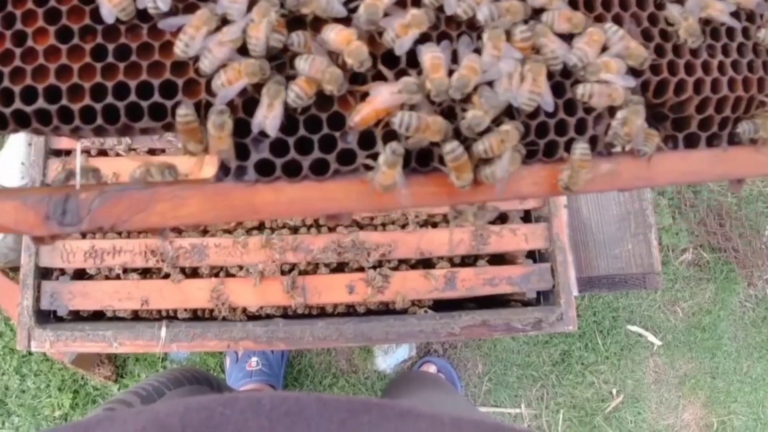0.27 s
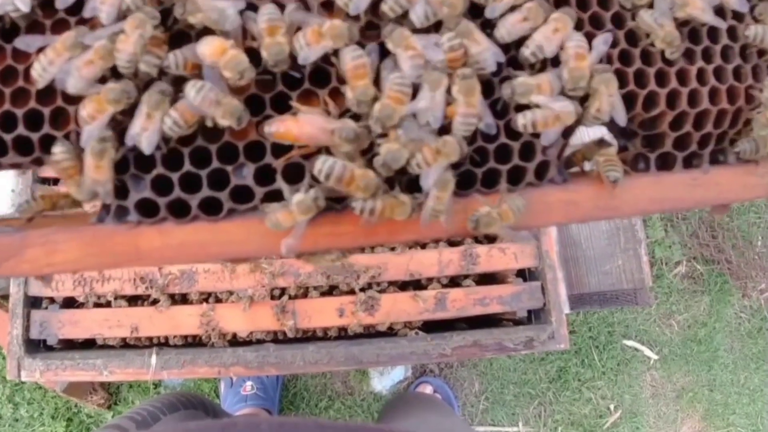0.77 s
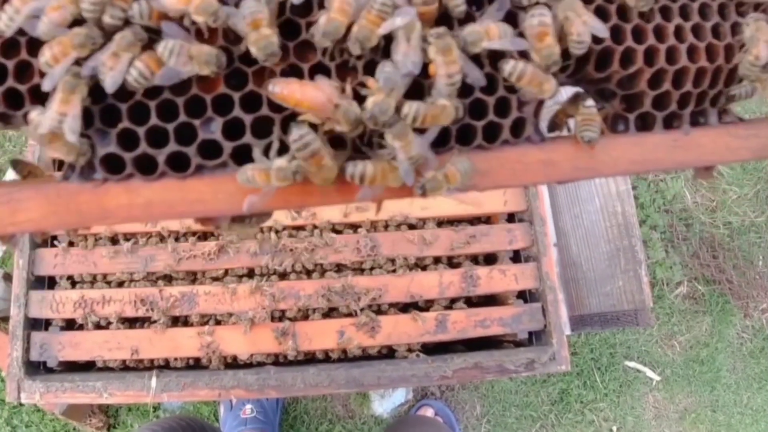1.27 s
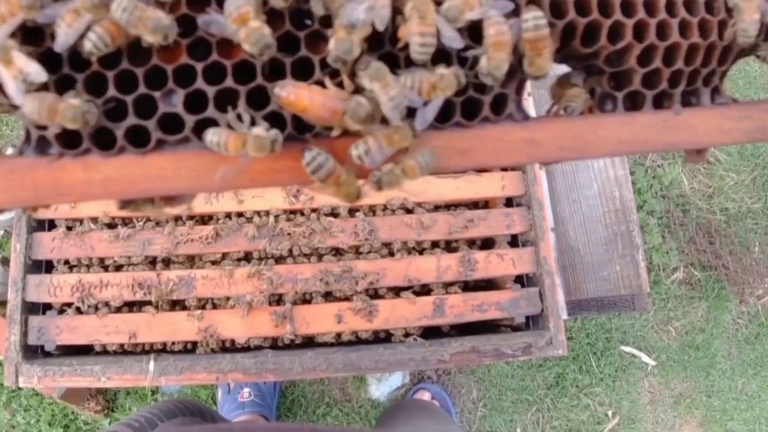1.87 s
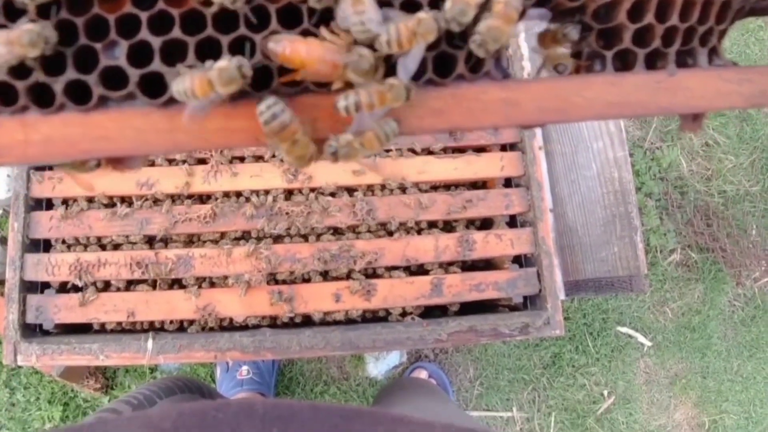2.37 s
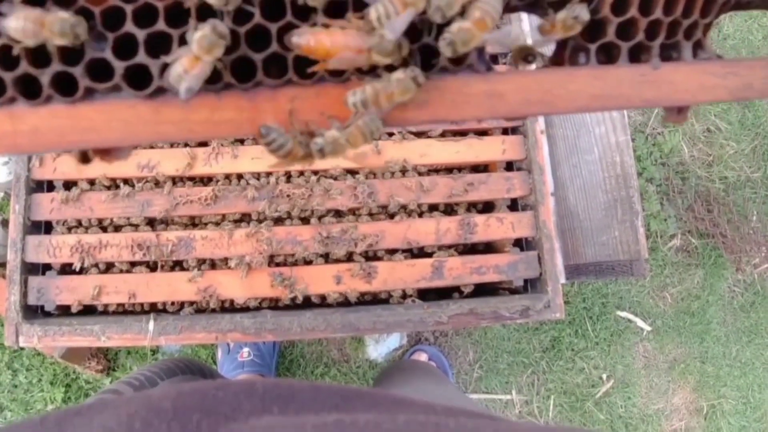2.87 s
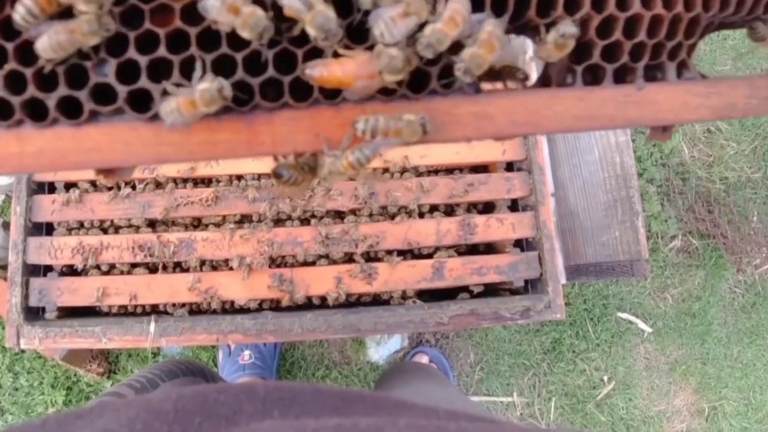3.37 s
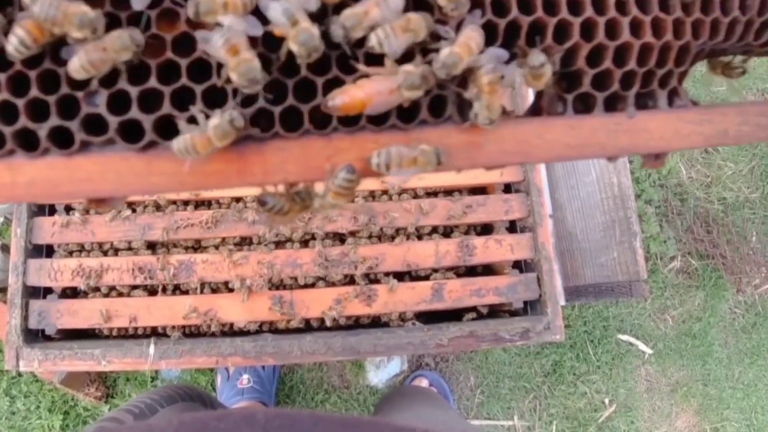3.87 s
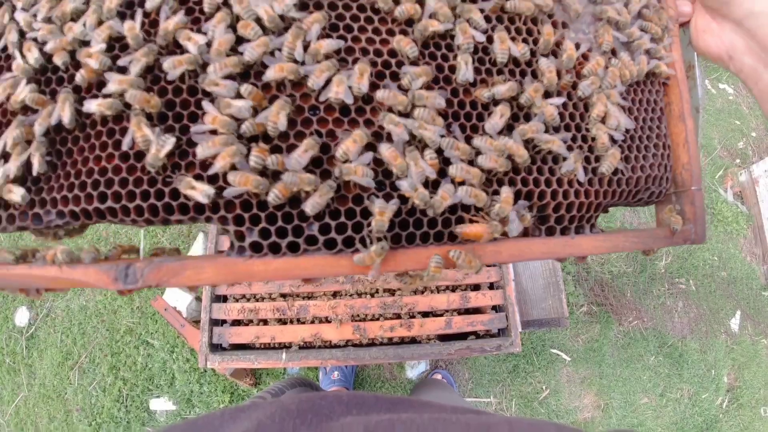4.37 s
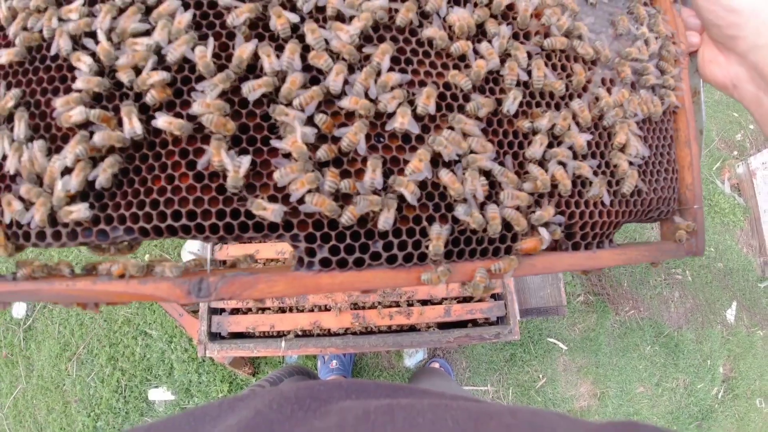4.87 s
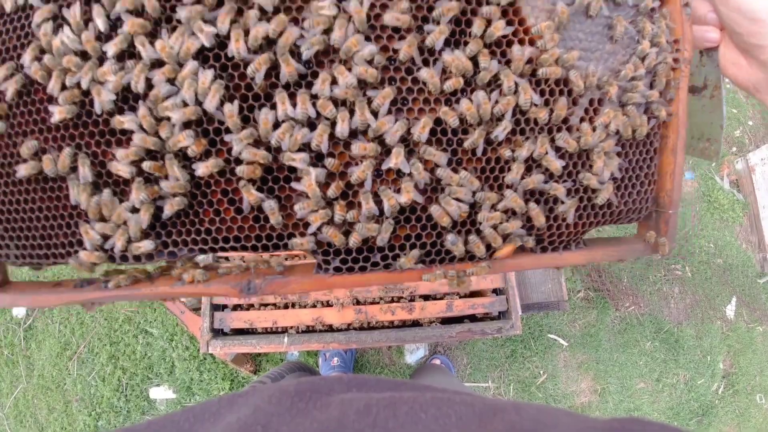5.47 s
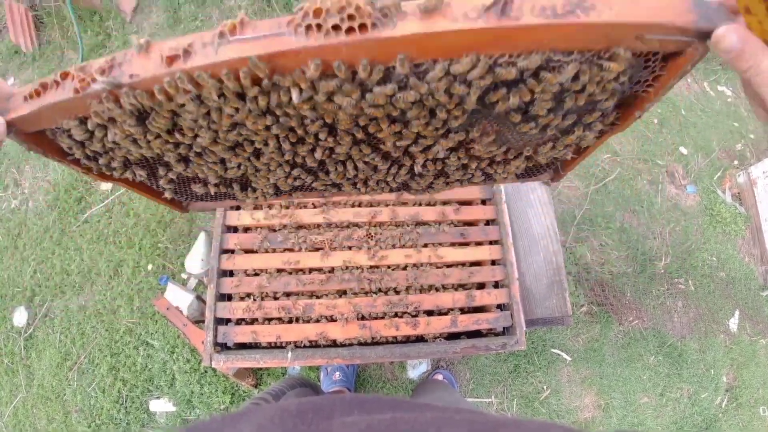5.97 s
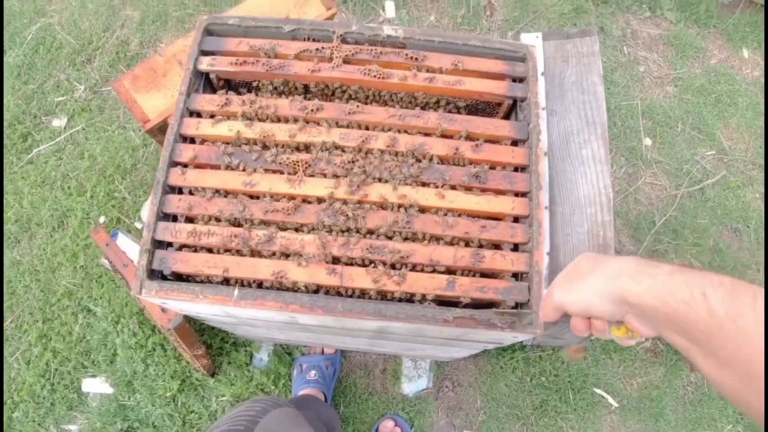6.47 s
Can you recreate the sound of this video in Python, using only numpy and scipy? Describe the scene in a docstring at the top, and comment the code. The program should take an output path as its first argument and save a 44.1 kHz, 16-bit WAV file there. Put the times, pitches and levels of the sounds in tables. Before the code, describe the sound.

Many bees hum low and steadily in an open hive outdoors, small birds whistle and chatter, wind rumbles, and finally a tool scrapes wood.

```python
"""Open beehive in a meadow

Many bees beat their wings near 200 Hz (wandering harmonic tones) and single bees swell past.
A tool scrapes along the wooden box at the end: random slips ring resonances, and the wood groans.
Small birds whistle (gliding sines) and chatter (pulses through throat resonances), with yard echoes.
Gusts rumble on the microphone ports; meadow air and rustles are banded noise. Two short silences.
"""
import sys
import numpy as np
from scipy import signal
from scipy.io import wavfile
from scipy.ndimage import uniform_filter1d

SR = 44100
rng = np.random.default_rng(int(sys.argv[2]) if len(sys.argv) > 2 else 0)


def wrap_up_sound(samples):
    """Save the sound to the file named by the first command line argument, as 16-bit audio."""
    columns = np.atleast_2d(samples).T
    # keep every value between -1 and 1, then stretch to whole-number steps
    tamed = np.clip(columns, -1, 1)
    steps = np.round(tamed * 32767).astype(np.int16)
    wavfile.write(sys.argv[1], SR, steps)


N = 296352

# Stretches of sound between the silences. Each row: start in seconds, end in seconds.
STRETCHES = [(-1.0, 4.045), (4.253, 6.0115), (6.219, 8.0)]
# Breathy throat resonances of the birds. Each row: centre in Hz, width in Hz, gain in dB.
THROAT_MODES = [(1900, 500, -3), (2600, 450, -2), (3600, 600, 1), (4800, 400, -3), (5800, 500, -13)]


def from_db(db):
    """Decibels to gain."""
    return 10 ** (np.asarray(db) / 20)


def rms_one(x):
    """Scale to unit rms."""
    return x / np.sqrt(np.mean(x ** 2) + 1e-20)


def in_time(rows):
    """Columns of a curve table (time in seconds first) at every sample."""
    s, *columns = np.transpose(rows)
    return [np.interp(np.arange(N) / SR, s, column) for column in columns]


def at_hz(points, hz):
    """Read a spectrum table on a log frequency axis."""
    table_hz, values = np.array(points).T
    return np.interp(np.log(hz), np.log(table_hz), values)


def drift(rate_hz):
    """Slow chance of spread 1: coarse noise through a double one-pole low-pass."""
    r = np.exp(-80 * np.pi * rate_hz / SR)  # one coarse step is 40 samples
    noise = rng.standard_normal(N // 40 + 2002)
    slow = signal.lfilter([1], [1, -2 * r, r * r], noise)[2000:]
    return np.interp(np.arange(N) / 40, np.arange(len(slow)), rms_one(slow))


def resonate(x, modes):
    """Parallel two-pole resonances of alternating sign."""
    out = 0
    for k, (hz, width_hz, db) in enumerate(modes):
        r = np.exp(-np.pi * width_hz / SR)
        b = np.array([1, 0, -1]) * (1 - r * r) / 2
        a = [1, -2 * r * np.cos(2 * np.pi * hz / SR), r * r]
        out = out + (-1) ** k * from_db(db) * signal.lfilter(b, a, x)
    return out


def stereo(mid, side, alike):
    """Two unrelated signals mixed to a left-right likeness."""
    alike = np.clip(alike, -1, 1)
    return np.sqrt((1 + alike) / 2) * mid + np.sqrt((1 - alike) / 2) * side * [[1], [-1]]


def stroke(turn, first_db, fall_db):
    """One wing cycle: harmonics of random phase; first_db lifts the lowest, fall_db dulls those above 3."""
    # Wing harmonics. Each row: multiple of the beat rate, level in dB before first_db and fall_db.
    lines = [(1, -4.8), (2, 0), (3, -18.5), (4, -21), (5, -16), (6, -28), (7, -25), (8, -32), (9, -34)]
    wave = 0
    for k, db in lines:
        line_db = db + first_db * (k < 1.5) - fall_db * max(k - 3, 0)
        wave = wave + from_db(line_db) * np.sin(2 * np.pi * (round(k) * turn + rng.random()))
    return wave


def bees(wing_hz, spread_share, jitter, first_db, fall_db, swell_db, count):
    """Each bee repeats one stroke at its own wandering rate, swells as it moves and reaches one port first."""
    wander_share, port_lag_s = .03, .00008  # spreads of slow rate drift and of lag between the ports
    turn = np.linspace(0, 1, 513)
    out = np.zeros((2, N))
    for spread in np.linspace(-1.7, 1.7, count):
        hz = wing_hz * (1 + spread_share * spread + wander_share * drift(2.5) + jitter * drift(40))
        strokes = np.cumsum(hz) / SR
        lag = hz * port_lag_s * rng.normal() / 2
        near = from_db(swell_db * drift(5.0) - 1.5 * spread ** 2)
        phases = [(strokes + lag) % 1, (strokes - lag) % 1]
        out += near * np.interp(phases, turn, stroke(turn, first_db, fall_db))
    return rms_one(out)


def fly_bys(jitter, fall_db):
    """Single bees swell past, each on its own sagging wing tone."""
    # Close passes. Each row: nearest moment in seconds, level in dB, wing rate in Hz,
    # half width in seconds, lift of the lowest harmonic in dB.
    passes = [(.08, -61, 240, .1, -10), (1.03, -55, 256, .1, -10), (1.38, -60, 250, .1, -10),
              (1.8, -54, 268, .1, -10), (1.8, -57, 184, .06, 3), (2.0, -59, 250, .1, -10),
              (2.4, -59, 268, .1, -10), (2.8, -55, 254, .1, -10), (3.25, -59, 240, .1, -10),
              (3.745, -52, 208, .035, -8), (3.76, -55, 270, .04, -12), (3.83, -48, 272, .035, -14),
              (3.85, -50, 222, .045, -3), (3.885, -53, 335, .04, -8), (3.97, -53, 192, .05, -8),
              (4.6, -57, 236, .09, 5), (4.7, -51, 214, .07, -8), (4.71, -55, 246, .04, -10),
              (5.08, -52, 268, .05, -12), (5.24, -54, 254, .1, -12)]
    sag_share, third_db = .04, -9  # rate sags by this share each way; added third harmonic re the lift
    t, turn, out = np.arange(N) / SR, np.linspace(0, 1, 513), np.zeros(N)
    waver = drift(25)
    for k, (s, db, wing_hz, half_s, first_db) in enumerate(passes):
        away = (t - s) / half_s
        hz = wing_hz * (1 - sag_share * np.tanh(away / 2) + jitter * np.roll(waver, k * SR // 3))
        third = from_db(first_db + third_db) * np.sin(2 * np.pi * (3 * turn + rng.random()))
        wave = np.interp(np.cumsum(hz) / SR % 1, turn, stroke(turn, first_db, fall_db) + third)
        out += from_db(db) / (1 + away ** 2) * wave
    return out


def colony():
    """Many bees on the comb, faster and duller ones far off in the air, and single passes."""
    # Hum of the comb. Each row: time in seconds, level in dB.
    hum = [(0.0, -57), (.07, -51), (.46, -58), (.8, -59), (1.03, -52), (1.3, -55), (1.58, -58), (1.78, -50),
           (2.12, -56), (2.22, -51), (2.85, -52), (3.1, -53), (3.4, -48), (3.62, -54), (3.83, -49),
           (4.3, -55), (4.72, -50), (4.97, -54), (5.05, -52), (6.0, -52.5), (6.25, -58), (6.72, -57)]
    comb = bees(204, spread_share=.068, jitter=.017, first_db=0, fall_db=0, swell_db=6.5, count=13)
    flying = bees(255, spread_share=.11, jitter=.008, first_db=-15, fall_db=5.0, swell_db=5.0, count=8)
    comb_db, flying_db = in_time(hum)[0], -61
    return from_db(comb_db) * comb + from_db(flying_db) * flying + fly_bys(jitter=.02, fall_db=3.5)


def rubbed(slips, modes):
    """Slips ring a body twice over; in the first pass each mode swells and fades with the grip."""
    grip_db, grip_hz = 2.0, 14  # the shifting contact favours now one mode, now another
    first = 0
    for k, mode in enumerate(modes):
        first = first + (-1) ** k * from_db(grip_db * drift(grip_hz)) * resonate(slips, [mode])
    return resonate(first, modes)


def groan(jitter, second_db, tremble_db):
    """The wood sticks and slips in a rough gliding tone with a weaker octave."""
    # Low tone. Each row: time in seconds, pitch in Hz, rms level of the fundamental in dB.
    glide = [(6.47, 380, -70), (6.5, 365, -43), (6.53, 370, -56), (6.575, 370, -45), (6.6, 400, -58),
             (6.635, 420, -44), (6.66, 385, -38), (6.682, 320, -41), (6.7, 240, -44), (6.72, 222, -42)]
    hz, db = in_time(glide)
    phase = 2 * np.pi * np.cumsum(hz * (1 + jitter * drift(60))) / SR
    on = np.arange(N) > glide[0][0] * SR
    gain = on * np.sqrt(2) * from_db(db + tremble_db * drift(40))
    return gain * (np.sin(phase) + from_db(second_db) * np.sin(2 * phase))


def scrape(per_s, size_db):
    """Dense uneven slips of steel on wood ring the tool, its pitch and brightness varying, and the box wall."""
    # Strokes. Each row: time in seconds, tool level in dB, box wall level in dB,
    # brightness as a gain above 2200 Hz, ring pitch as a ratio.
    strokes = [(6.22, -45, -55, .8, .99), (6.33, -51, -55, .6, .99), (6.35, -45, -57, .7, .99),
               (6.44, -39, -52, 1.0, 1.0), (6.47, -43, -56, 1.0, .98), (6.492, -44, -42, 1.0, .97),
               (6.546, -46, -43, 1.0, .96), (6.612, -42, -45, 1.0, 1.02), (6.66, -40, -38.5, 1.1, 1.03),
               (6.72, -41, -50, 1.2, 1.0)]
    # Tool resonances. Each row: centre in Hz before the pitch ratio, width in Hz, gain in dB per pass.
    tool_modes = [(860, 70, -9), (1180, 350, -10), (1420, 140, -2.5), (1640, 110, 1.5), (1760, 130, 3.5),
                  (1910, 130, 0), (2300, 260, -1), (2620, 200, -3), (2900, 260, -1), (3200, 300, -.8),
                  (3600, 400, -3), (4050, 400, -3.5), (4800, 500, -7.5), (6000, 1800, -17)]
    # Box wall resonances. Each row: centre in Hz, width in Hz, gain in dB per pass.
    wall_modes = [(225, 70, -3), (310, 70, -1), (382, 90, 0), (458, 80, -.5), (520, 80, -3), (700, 70, -6),
                  (865, 60, -6), (1040, 120, -10)]
    tool_db, wall_db, bright, pitch = in_time(strokes)
    slips = (rng.random((2, N)) < per_s / SR) * rng.choice([-1, 1], (2, N))
    slips = slips * from_db(size_db * np.minimum(rng.exponential(1, (2, N)), 4))
    # reading the ring faster or slower bends its pitch
    read = np.cumsum(pitch)
    read = read - read[-1] + N - SR // 10
    rung = np.array([np.interp(read, np.arange(N), x) for x in rubbed(slips, tool_modes)])
    dull = signal.sosfilt(signal.butter(2, 2200, fs=SR, output="sos"), rung)
    shaded = dull + bright * (rung - dull)
    tool = from_db(tool_db) * stereo(*shaded, .55) / np.std(rung[:, N // 2:])
    wall = from_db(wall_db) * rms_one(stereo(*rubbed(slips, wall_modes), .97))
    on = np.arange(N) > STRETCHES[2][0] * SR - 500
    return (tool + wall) * on + groan(jitter=.03, second_db=-22, tremble_db=2.5)


def whistles(waver, flutter_hz):
    """Each note is a near sine gliding along a parabola through three pitches; rough ones flutter."""
    # Whistled notes. Each row: start in seconds, length in ms, start, middle and end pitch in Hz,
    # level in dB before the lifts below, roughness 0-1.
    notes = [(0.022, 18, 4150, 4100, 4450, -67, .3), (0.04, 48, 4920, 4800, 4650, -62, .2),
             (0.612, 20, 4000, 3750, 3500, -72, .3), (0.646, 16, 3700, 3380, 3050, -73, .3),
             (0.665, 9, 3100, 3500, 4000, -67, .3), (0.671, 33, 3900, 2950, 2500, -65, .5),
             (0.678, 18, 3800, 4000, 3900, -68, .5), (1.165, 20, 3680, 3000, 2770, -67.5, .3),
             (1.34, 20, 3870, 4050, 4250, -62, .5), (1.364, 24, 4800, 4940, 4850, -67, .3),
             (1.826, 9, 3720, 4000, 4280, -61.2, .3), (2.27, 44, 2650, 2640, 2630, -70, .9),
             (2.283, 9, 3600, 4400, 5150, -63, .3), (2.289, 15, 5150, 5200, 5200, -61, .3),
             (2.478, 32, 3900, 3950, 3900, -67.8, .3), (3.186, 27, 3760, 4130, 4500, -56, .8),
             (3.213, 25, 4400, 3650, 3240, -52.5, .6), (3.228, 24, 3700, 3950, 3450, -59, .8),
             (3.244, 26, 2800, 3000, 3300, -60, .9), (3.262, 20, 3900, 3500, 3100, -63, .9),
             (3.268, 30, 2950, 2950, 3200, -58, .9), (3.331, 28, 3200, 3500, 3400, -69, .9),
             (3.298, 34, 3710, 3010, 2690, -62.0, .8), (3.655, 50, 5000, 4400, 3600, -66, .3),
             (3.672, 44, 5100, 4100, 3150, -58.5, .4), (3.712, 50, 3100, 2500, 1600, -64.5, .5),
             (4.25, 22, 4950, 5000, 4900, -68, .3), (4.766, 28, 3710, 4170, 4090, -46.3, .3),
             (4.794, 29, 4190, 3750, 4020, -46.4, .3), (4.824, 12, 2600, 2900, 3300, -58, .9),
             (4.832, 22, 3250, 3600, 3600, -47.5, .8), (4.852, 16, 2900, 3200, 3500, -56, .9),
             (4.852, 26, 2000, 2350, 2400, -62, .9), (4.898, 30, 4200, 4180, 4100, -66, .3),
             (4.952, 20, 3100, 3300, 3500, -63, .5), (5.115, 25, 3820, 3930, 4100, -63, .5),
             (5.245, 26, 3700, 4200, 4500, -62, .5), (5.335, 17, 2330, 2820, 1800, -60.7, .3),
             (5.606, 44, 3480, 3800, 4050, -48.2, .3), (5.657, 34, 3650, 3500, 3250, -50.0, .8),
             (5.763, 20, 2140, 2030, 1400, -43.5, .4), (5.783, 12, 1450, 1100, 900, -54, .8),
             (5.82, 18, 880, 1000, 900, -52.0, .3)]
    top_share = .44  # share of the length at which a note's envelope peaks
    bend = np.log(.5) / np.log(top_share)
    out, shake, tremble = np.zeros(N), drift(250), drift(150)
    flutter = np.sin(2 * np.pi * np.cumsum(flutter_hz * (1 + .25 * drift(60))) / SR)
    for s, ms, start_hz, middle_hz, end_hz, db, rough in notes:
        at, u = round(s * SR), np.linspace(0, 1, round(ms * SR / 1000))
        part = slice(at, at + len(u))
        hz = np.polyval(np.polyfit([0, .5, 1], [start_hz, middle_hz, end_hz], 2), u)
        hz = hz * (1 + waver * rough * (shake[part] + 1.5 * flutter[part]))
        shape = np.sin(np.pi * u ** bend) ** .7
        gain = from_db(db + 3.0 + rough * (2.5 + 4.0 * tremble[part]))
        out[part] += shape * gain * np.sin(2 * np.pi * np.cumsum(hz) / SR)
    return out


def zigzags(waver, tremble_db):
    """One unbroken whistle: a fall to the dip, a rounded hump, a deeper fall and a quick fading warble."""
    # Calls. Each row: dip in seconds, first top in Hz, first fall in ms, warble length in ms, level in dB.
    calls = [(.716, 4450, 15, 23, -49.5), (1.871, 4500, 16, 22, -50.5), (2.324, 5200, 21, 32, -45.5)]
    dip_hz, hump_hz, low_hz = 3170, 4550, 2780  # hump_hz: top between the dip and the low
    rise_ms, drop_ms = 18.5, 23.5  # up the hump and down again
    warble_per_s, warble_top_hz, warble_fade_db = 100, 3620, -5
    warble_lift_hz = 350  # the warble's low turns climb this far above low_hz
    # pitches near throat_hz come out loudest; losses below and above it
    throat_hz, throat_width_hz, below_db, above_db = 3780, 480, 8, 11
    out, shake, tremble = np.zeros(N), drift(200), drift(150)
    low_ms = rise_ms + drop_ms
    for s, top_hz, fall_ms, warble_ms, db in calls:
        ms = np.arange(-fall_ms, low_ms + warble_ms, 1000 / SR)
        at = round((s - fall_ms / 1000) * SR)
        part = slice(at, at + len(ms))
        down = np.clip(-ms / fall_ms, 0, 1)
        up = np.interp(ms, [0, rise_ms, low_ms], [0, .5, 1])
        foot = np.where(up < .5, dip_hz, low_hz)
        hz = foot + (top_hz - foot) * np.sin(np.pi / 2 * down) ** 1.4
        hz = hz + (hump_hz - foot) * np.sin(np.pi * up) ** .95
        late = np.clip(ms - low_ms, 0, None)
        lift = warble_lift_hz * np.clip(late * warble_per_s / 1000, 0, 1)
        turns = np.sin(np.pi * warble_per_s * late / 1000) ** 2
        hz = hz + lift + (warble_top_hz - low_hz - lift) * turns
        hz = hz * (1 + waver * shake[part])
        loss_db = np.where(hz > throat_hz, above_db, below_db)
        throat_db = loss_db * (np.exp(-((hz - throat_hz) / throat_width_hz) ** 2) - 1)
        edges = np.clip(np.minimum(ms - ms[0], ms[-1] - ms) / 3.0, 0, 1)
        gain = from_db(db + throat_db + warble_fade_db * late / warble_ms + tremble_db * tremble[part])
        out[part] += edges * gain * np.sin(2 * np.pi * np.cumsum(hz) / SR)
    return out


def chatter(pulse_hz, grain_db, sharp):
    """Bursts of fast uneven syrinx pulses ring three throat resonances, set per burst, over a little breath."""
    # Harsh bursts. Each row: time in seconds (the burst opens 2 ms earlier), level in dB before a -10.5 dB
    # trim, low and main throat pitch in Hz, low and high resonance in dB re main, length scale in seconds.
    bursts = [(4.848, -47, 2300, 3500, -6, -8, .035), (4.9681, -42, 1900, 3400, -1, -5, .04),
              (5.0818, -45, 2650, 3500, -3, -3, .03), (5.1644, -41, 2500, 3750, -2, -2, .035),
              (5.2614, -41, 2100, 3700, -8, -3, .04), (5.3644, -41, 2700, 3650, -3, -5, .03),
              (5.4814, -46, 1950, 3600, -7, -10, .05)]
    high_hz, width_hz, breath_db = 4800, 420, -8
    swing_share = .05  # throat pitch wander inside a burst
    tail_db, tail_s = -12, .07  # a softer mutter after each burst
    out, t = np.zeros(N), np.arange(round(.15 * SR)) / SR
    tail = from_db(tail_db) * t / tail_s * np.exp(1 - t / tail_s) * (1 - t / t[-1])
    chop = (.5 + .5 * np.sin(2 * np.pi * np.cumsum(pulse_hz * (1 + .25 * drift(40))) / SR)) ** sharp
    rasp = rng.standard_normal(N) * (.4 + chop) * from_db(grain_db * drift(120))
    for s, db, low_hz, main_hz, low_db, high_db, long_s in bursts:
        at, u = round((s - .002) * SR), t / long_s
        part = rasp[at:at + len(u)]
        rung = from_db(breath_db) * resonate(part, THROAT_MODES)
        for hz, level_db in [(low_hz, low_db), (main_hz, 0), (high_hz, high_db)]:
            mode = [(hz, width_hz, 0)]
            rung = rung + from_db(level_db) * resonate(resonate(part, mode), mode)
        read = np.cumsum(1 + swing_share * drift(30)[:len(u)])
        rung = np.interp(read, np.arange(len(u)), rung)
        shape = 1.5 * u ** .35 * np.exp(-u ** 2 * 2.2) + tail
        out[at:at + len(u)] += from_db(db - 10.5) * rms_one(rung) * shape
    return out


def tick():
    """A single dry beak click ringing briefly in the throat."""
    at_s, peak_db = 4.9695, -44
    click = np.zeros(N)
    click[round(at_s * SR)] = 1
    rung = resonate(click + 1e-18, THROAT_MODES)
    return from_db(peak_db) * rung / np.abs(rung).max()


def yard(x):
    """Direct sound from the left; sparse bright scatter from leaves and walls dies away, unlike on each side."""
    echo_db, t60_s, low_hz = -18, .17, 2500
    lag_s = .00004  # the right port hears the birds later
    t = np.arange(round(.25 * SR)) / SR
    taps = (rng.random((2, len(t))) < 500 / SR) * rng.standard_normal((2, len(t))) * (t > .004)
    taps = taps * from_db(echo_db - 60 * t / t60_s)
    bright = signal.sosfilt(signal.butter(4, low_hz, "high", fs=SR, output="sos"), x + 1e-18)
    echoes = signal.fftconvolve(bright[None], taps, axes=1)
    return np.array([x, np.roll(x, round(lag_s * SR))]) + echoes[:, :N]


def far_birds(per_s, level_db):
    """Faint short slides from birds far off, at random moments and pitches, left or right."""
    out = np.zeros((2, N))
    for when, pitch, slide, size, long, pan in rng.random((round(per_s * N / SR), 6)):
        u = np.linspace(0, 1, round((.012 + .03 * long) * SR))
        hz = 2700 + 2200 * pitch + 900 * (slide - .65) * u
        note = from_db(level_db + 9 * size) * np.sin(np.pi * u) * np.sin(2 * np.pi * np.cumsum(hz) / SR)
        # pan by arrival time: left 0-11 samples late, right always 6
        at, lag = int(when * (N - len(u) - 20)), int(12 * pan)
        out[0, at + lag:at + lag + len(u)] += note
        out[1, at + 6:at + 6 + len(u)] += note
    return out


def wind(alike):
    """Lumpy pressure on the ports: a deep rumble and a layer above it; eddies swell and collapse."""
    # Breeze. Each row: time in seconds, rumble level in dB, upper rumble in dB re rumble.
    breeze = [(0, -62, -4), (.2, -57, -6), (.85, -57, -9), (1.3, -49, -8), (1.6, -53, -5), (2.3, -48, -8),
              (2.9, -52, -6), (3.6, -55, -5), (4.04, -55, -5), (4.3, -58, -11), (5.2, -59, -3),
              (5.6, -58, -4), (6.0, -58, -4), (6.25, -53, -4), (6.72, -47, -6)]
    # Eddies hitting the ports. Each row: peak in seconds, level in dB, upper rumble in dB re rumble.
    buffets = [(.98, -45, -8), (1.05, -37, -16), (1.105, -32, -10), (1.24, -42, -16), (1.36, -40, -25),
               (1.43, -49, -8), (1.64, -48, -10), (1.87, -42, -22), (2.04, -43, -12), (2.13, -37, -14),
               (2.18, -42, -5), (2.4, -34, -18), (2.48, -36, -17), (2.62, -38, -7), (2.69, -42, -14),
               (2.8, -45, -23), (3.15, -46, -20), (3.3, -47, -10), (3.4, -41, -16), (3.98, -52, -11),
               (4.322, -53, -19), (4.52, -54, -13), (4.666, -54, -11), (4.908, -54, -22), (5.834, -55, -9),
               (6.37, -43, -8), (6.52, -36, -8), (6.62, -45, -8)]
    lumps_db, rise_s, fall_s = 2.0, .028, .02  # breeze unevenness; buffet half widths
    t = np.arange(N) / SR
    breeze_db, upper_db = in_time(breeze)
    low = from_db(breeze_db + lumps_db * drift(6))
    upper = low * from_db(upper_db)
    for s, db, upper_db in buffets:
        swell = from_db(db) * np.exp(-((t - s) / np.where(t < s, rise_s, fall_s)) ** 2)
        low, upper = low + swell, upper + swell * from_db(upper_db)
    out = 0
    for low_hz, high_hz, level in [(25, 48, low), (66, 112, upper)]:
        band = signal.butter(2, [low_hz, high_hz], "band", fs=SR, output="sos")
        mid, side = signal.sosfilt(band, rng.standard_normal((2, N + SR)))[:, SR:]
        pressure = rms_one(stereo(mid, side, alike))
        # even out the noise's own swells so the level curve leads
        local_power = uniform_filter1d(pressure ** 2, size=round(SR / low_hz))
        even = pressure / (.5 + np.sqrt(local_power + 1e-12))
        out = out + level * rms_one(even)
    return out


def rustles():
    """Short soft swells of grainy band noise."""
    # Soft rushes. Each row: peak in seconds, half width in seconds, low edge in Hz, high edge in Hz, level in dB.
    rushes = [(1.275, .04, 3200, 6600, -77), (2.27, .05, 1800, 3800, -72), (2.87, .03, 3100, 6500, -77),
              (3.44, .05, 2000, 4400, -71), (3.86, .08, 300, 700, -52), (4.69, .055, 1300, 3200, -61),
              (4.7, .05, 11500, 15200, -73), (6.3, .06, 8000, 15000, -82), (6.66, .05, 9300, 11000, -68)]
    t, out = np.arange(N) / SR, 0
    grain = rng.standard_normal((2, N)) * from_db(2.0 * drift(150))
    for s, half_s, low_hz, high_hz, db in rushes:
        band = signal.sosfilt(signal.butter(3, [low_hz, high_hz], "band", fs=SR, output="sos"), grain)
        out = out + from_db(db) * np.exp(-((t - s) / half_s) ** 2) * rms_one(band)
    return out


def air(patchy_db):
    """Meadow air and wing rustle: flickering third-octave noise bands, each with its left-right likeness."""
    # Spectrum. Each row: frequency in Hz, relative density in dB per Hz.
    spectrum = [(240, -22), (310, -1.5), (500, -2), (750, -9.5), (1040, -7), (1260, -19), (1490, -11.5),
                (2300, -22), (3500, -20), (4600, -26), (5500, -38), (7200, -37.5), (10000, -35.5),
                (12800, -39), (15500, -50)]
    # Level. Each row: time in seconds, level in dB, lift of the hiss in dB.
    levels = [(0, -61, 3), (.8, -62, 3), (1.2, -60, 0), (2, -61, 1), (3, -62, -1), (3.7, -61, -1),
              (4.3, -60, -1), (4.7, -59, 0), (5.2, -59, -1), (5.9, -60, -1), (6.3, -58, 3), (6.7, -58, 4)]
    # Left-right likeness. Each row: frequency in Hz, correlation (1 = same on both sides).
    likeness = [(250, .985), (540, .95), (1130, .85), (2350, .4), (4890, .3), (9000, .6)]
    hiss_from_hz = 7000
    level_db, hiss_db = in_time(levels)
    out, together = 0, drift(3.0)
    edges_hz = 220 * 2 ** (np.arange(20) / 3)
    white = rng.standard_normal((2, 2, N))
    for k, (low_hz, high_hz) in enumerate(zip(edges_hz, edges_hz[1:])):
        band = signal.butter(2, [low_hz, high_hz], "band", fs=SR, output="sos")
        mid, side = signal.sosfilt(band, white[k % 2])
        hz = np.sqrt(low_hz * high_hz)
        flicker_db = patchy_db * (.6 * together + drift(12))
        gain = from_db(at_hz(spectrum, hz) + hiss_db * (hz > hiss_from_hz) + flicker_db)
        out = out + gain * stereo(mid, side, at_hz(likeness, hz))
    return from_db(level_db) * rms_one(out)


def scene():
    """All sources at the two ports."""
    near = whistles(waver=.036, flutter_hz=280) + zigzags(waver=.016, tremble_db=2.5)
    near = near + chatter(pulse_hz=200, grain_db=2.0, sharp=1.5) + tick()
    birds = yard(near) + far_birds(per_s=22, level_db=-82)
    around = wind(alike=.2) + rustles() + air(patchy_db=1.5)
    return colony() + scrape(per_s=4000, size_db=2.8) + birds + around


def record(dry):
    """Silences open with a hard cut and end in a quick fade-in; a steep low-pass removes the top."""
    t, in_s, out_s, cutoff_hz = np.arange(N) / SR, .012, .0008, 15300
    on = 0
    for start_s, end_s in STRETCHES:
        on = on + np.clip((t - start_s) / in_s + .5, 0, 1) * np.clip((end_s - t) / out_s, 0, 1)
    on = np.sin(np.pi / 2 * on) ** 2
    top = signal.ellip(10, .5, 70, cutoff_hz, fs=SR, output="sos")
    return signal.sosfilt(top, dry * on)


dry = scene()
out = record(dry)
wrap_up_sound(out)
```